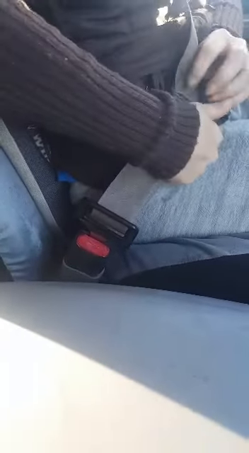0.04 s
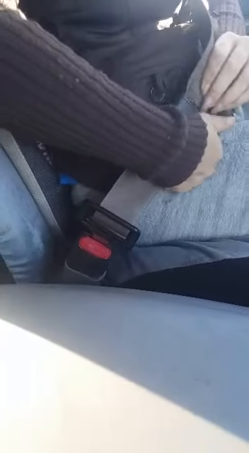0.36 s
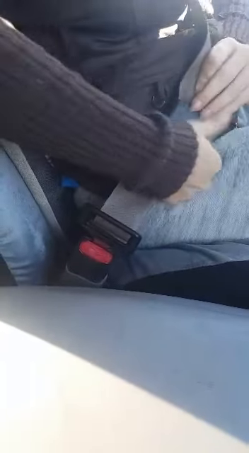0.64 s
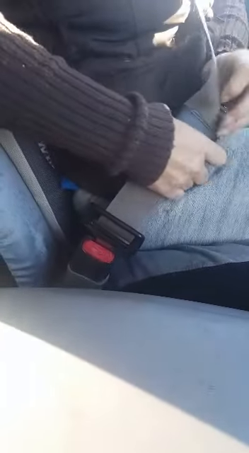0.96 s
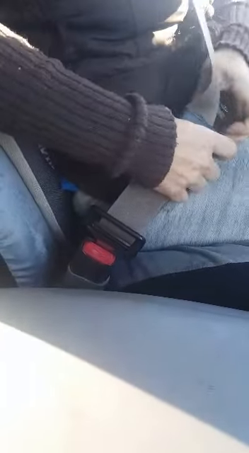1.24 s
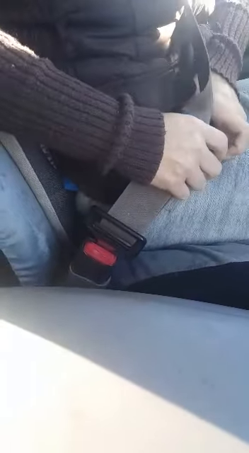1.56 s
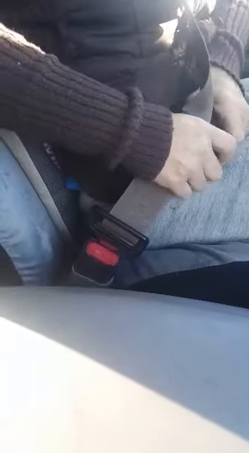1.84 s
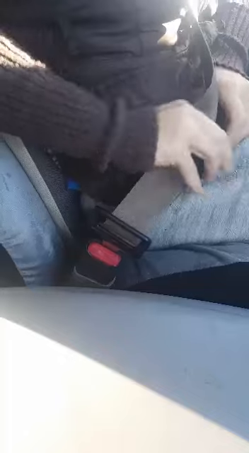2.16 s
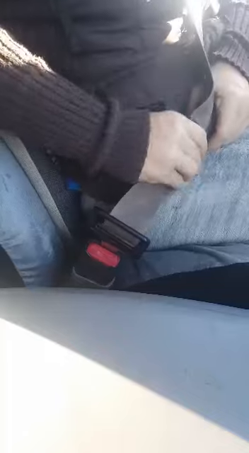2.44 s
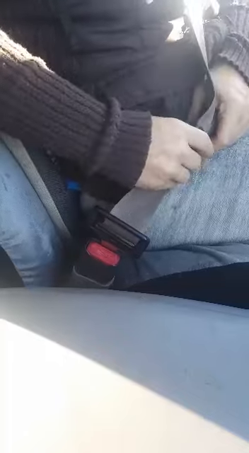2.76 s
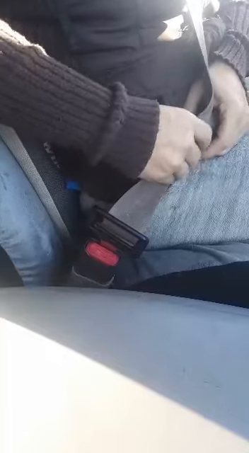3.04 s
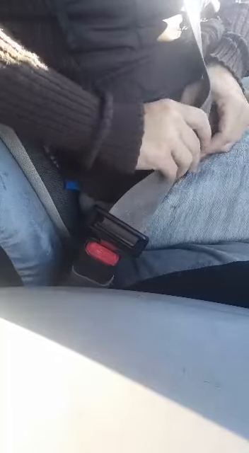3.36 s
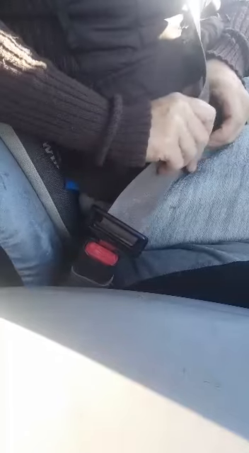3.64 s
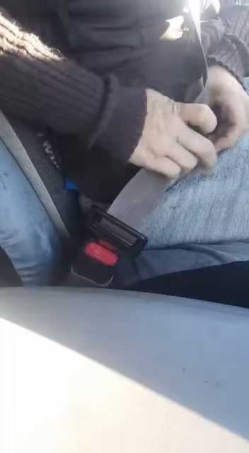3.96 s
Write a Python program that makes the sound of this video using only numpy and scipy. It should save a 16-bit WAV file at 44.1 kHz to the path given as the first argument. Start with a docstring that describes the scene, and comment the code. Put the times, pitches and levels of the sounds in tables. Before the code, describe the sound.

Close handling of a seat belt in a padded car cabin: soft sleeve rustles and brushes first, a small buckle click, then a cluster of sharper webbing scrapes. The engine hums low throughout.

```python
"""Inside a car with its engine idling, hands work along a fastened seat belt.
The engine hums over a low rumble. Tiny slips of fibres make sleeves rustle, hands brush
cloth and the belt's weave rasp in short scrapes. Fingertips pat, nails snap over the weave,
the buckle ticks as its latch knocks, and one tug on the belt thuds in the seat.
The padded cabin gives the brushes, scrapes and clicks a very short echo."""
import sys
import numpy as np
from scipy import signal
from scipy.fft import rfft, irfft
from scipy.io import wavfile

SR = 44100
rng = np.random.default_rng(int(sys.argv[2]) if len(sys.argv) > 2 else 0)


def unload_audio(sound):
    """Save the sound as a 16-bit wav file, at the path given as the first command line argument."""
    columns = np.transpose(np.atleast_2d(sound))
    # keep every value between -1 and 1, then stretch to whole-number steps
    steps = np.round(np.clip(columns, -1, 1) * 32767)
    wavfile.write(sys.argv[1], SR, steps.astype(np.int16))


N = 176400  # 4 seconds

# tones of the idling engine: (multiple of the cycle rate, level [dB])
ENGINE_TONES = [(5, -78), (7, -55), (8, -47.5), (11, -49), (13, -55.5), (16, -47), (19, -44), (21, -51.5),
                (32, -65), (48, -55.5)]
# tone colour of the cabin's rumble and air: (frequency [Hz], relative level [dB])
RUMBLE_COLOUR = [(12, -32), (30, -11), (55, -3), (88, -5.5), (113, 7), (126, 3.5), (141, 1), (152, 4),
                 (168, -8), (190, 0.5), (222, -7.5), (256, 0), (295, -8), (325, -13.5), (420, -19.5),
                 (520, -23.5), (680, -25), (1100, -28.5), (1600, -35), (3000, -41), (5000, -46.5),
                 (16000, -50)]
# how alike the rumble is on both sides: (frequency [Hz], likeness [1 or more = alike])
RUMBLE_LIKENESS = [(50, 1.9), (115, 0.78), (200, 1.04), (300, 0.8), (700, 0.62), (1300, -0.11),
                   (2500, 0.15), (6000, 0)]
# which side the rumble leans to: (frequency [Hz], left minus right [dB])
RUMBLE_BALANCE = [(60, -2), (120, 2.6), (270, -3), (700, 1), (2500, 1.5), (12000, 2.5)]
# sleeves sliding on cloth: (time [s], level [dB])
SLEEVE_LEVELS = [(0, -51), (.07, -90), (.33, -63), (.58, -65.5), (.66, -54.5), (.83, -58), (.93, -59),
                 (.99, -53), (1.12, -56.5), (1.27, -55), (1.36, -60.5), (1.57, -56), (1.72, -63),
                 (1.88, -60.5), (2.05, -70), (2.17, -59), (2.25, -64.5), (2.38, -56.5), (2.54, -70.5),
                 (2.68, -65), (2.84, -69.5), (3.2, -81), (3.42, -60.5), (3.78, -83), (4, -61)]
# tone colours of rubbed cloth and belt weave: (frequency [Hz], relative level [dB])
CLOTH_COLOUR = [(150, 3), (450, -8), (900, 0.5), (1600, -4), (2700, -4.5), (5000, -12.5), (8000, -13),
                (16000, -17)]
WEAVE_COLOUR = [(150, -12), (500, -9), (700, -7.5), (1100, -5), (1400, -6), (1800, -2.5), (2450, 0),
                (2750, -2), (3200, 0), (4200, -7), (5500, -6.5), (7200, -5), (10000, -6), (15500, -10)]
# hands brushing cloth, and fingers scraping the belt:
# (peak time [s], rise [s], fall [s], level [dB], treble tilt [dB per octave])
HAND_BRUSHES = [(.772, 0.025, .025, -45, -4), (.846, 0.11, .03, -48, 1), (.99, 0.052, 0.038, -50, -2.5),
                (1.288, 0.038, 0.038, -45.5, -2), (1.579, 0.064, 0.035, -43, -4),
                (1.647, 0.032, 0.022, -40, -8), (1.79, 0.055, .06, -50, -12),
                (1.886, 0.031, 0.017, -43, -4), (2.18, 0.05, 0.024, -55, 2),
                (2.34, 0.11, 0.066, -59.5, -2.5), (3.914, 0.013, 0.046, -39.5, -6)]
BELT_SCRAPES = [(.125, 0.024, 0.016, -39.5, -5), (.271, 0.053, 0.022, -44, -1),
                (.844, .035, .025, -49.5, -2.5), (3.231, 0.0056, 0.02, -23, 1),
                (3.259, 0.021, 0.032, -25.5, -0.5), (3.466, 0.0036, 0.014, -28.5, 0.1),
                (3.621, 0.029, 0.046, -18.5, -0.5), (3.688, 0.026, 0.0089, -40, -2.5)]
# fingertips patting belt and lap, and nails and the belt's edge snapping over the weave:
# (time [s], relative level [dB], treble tilt [dB per octave])
FINGER_PATS = [(.358, -38, -5.5), (.8235, -34.5, -3), (.896, -41.5, -1), (1.046, -43.5, -2),
               (1.223, -45, -12), (1.647, -41, 1), (1.717, -48.5, -4), (1.737, -39.5, -13),
               (1.775, -38, -12), (1.783, -43, -5), (1.829, -50, -7), (1.953, -48.5, -1), (1.92, -43.5, 1),
               (2.079, -54, -11), (2.565, -48.5, -5), (2.658, -46, -0.5), (3.659, -24, 4), (3.747, -47, -1),
               (3.8, -46, -1.5), (3.8145, -38, -2), (3.835, -38.5, -2), (3.875, -39, -1.5),
               (3.91, -41, 3.5)]
NAIL_SNAPS = [(.112, -49, -3.5), (.256, -42.5, 0), (.333, -48.5, -1.5), (1.386, -46.5, 3),
              (1.478, -41, 1.5), (1.684, -50.5, 4), (2.131, -42, -3.5), (2.401, -50.5, -1), (2.725, -57, 6),
              (2.89, -49, -2.5), (2.899, -47, -5.5), (2.945, -55, -2.5), (2.995, -59.5, 6),
              (3.094, -36.5, -2.5), (3.158, -38, 0), (3.218, -44, 0), (3.248, -30.5, -3), (3.29, -35, 1),
              (3.301, -41, 4), (3.311, -35, 2), (3.367, -39.5, -0.5), (3.373, -41, 0), (3.399, -45, 1),
              (3.432, -46.5, -2), (3.49, -44.5, -1), (3.544, -36, 3), (3.576, -43, 6), (3.584, -38, 1),
              (3.595, -22.5, 0), (3.641, -24, 2)]
# tone colours of a pat and a snap: (frequency [Hz], relative level [dB])
PAT_COLOUR = [(200, -14), (500, -2.5), (700, -0.5), (1150, 3.5), (1600, -9.5), (2700, -3.5), (4500, -13),
              (8000, -20), (16000, -25)]
SNAP_COLOUR = [(200, 6), (900, 0.5), (2500, 5.5), (4500, -3), (7500, 1.5), (16000, -6.5)]
# the belt tugging on the seat: (time [s], level [dB])
BELT_TUGS = [(3.549, -26)]
# the latch tongue knocking and bouncing in the buckle: (time [s], level [dB])
LATCH_KNOCKS = [(1.1563, -23), (1.159, -42), (1.1656, -29.5), (1.171, -37), (3.4642, -28)]
# the buckle's ringing tones: (frequency [Hz], relative level [dB], time to fade 60 dB [s])
BUCKLE_TONES = [(886, -14.5, 0.047), (1130, -7.5, 0.017), (1630, -7, 0.0064), (2050, -4, 0.0095),
                (2380, -2, 0.01), (2550, -6, 0.0099), (2750, -6.5, 0.02), (2990, -14.5, 0.015),
                (4860, -39, 0.01), (8260, -22, 0.0073)]
# the cabin's echo: (frequency [Hz], time to fade 60 dB [s])
CABIN_FADE = [(300, 0.052), (1300, 0.07), (3500, 0.091), (10000, 0.084)]
# tone colour of the microphone: (frequency [Hz], gain [dB])
MIC_COLOUR = [(5500, 0.5), (7200, 2), (8400, 5.5), (9300, -3), (10200, -4.5), (12300, -1), (15500, -1)]
# how far the right microphone opening's wave runs ahead: (frequency [Hz], phase lead [radians])
RIGHT_MIC_PHASE = [(1200, 0), (1900, -0.05), (2450, 1.04), (2950, -0.5), (3600, 0.6), (4600, -1),
                   (6000, 1.5), (8000, 0.5)]
# the right opening's level against the left: (frequency [Hz], gain [dB])
RIGHT_MIC_GAIN = [(1200, -0.13), (2400, 0.51), (4000, 0.76), (8000, -2), (13000, -1.3)]

RIGHT_LAG_S = .00016  # handling sounds reach the right side this much later


def amp(db):
    """Turns decibels into a number to multiply by."""
    return 10 ** (np.asarray(db) / 20)


def unit(x):
    """Scales a signal to an average strength (rms) of 1."""
    return x / np.sqrt(np.mean(x ** 2) + 1e-20)


def read(points, hz):
    """Looks up a table between its rows, with octaves evenly spaced."""
    f, value = np.transpose(points)
    return np.interp(np.log(hz + 1), np.log(f + 1), value)


def add(mix, s, sound):
    """Mixes a sound in, starting at s seconds."""
    part = mix[..., max(0, round(s * SR)):][..., :sound.shape[-1]]
    part += sound[..., :part.shape[-1]]


def colour(points, tilt=0, size=1024):
    """Makes a filter from a tone colour, tilted above 700 Hz by tilt dB per octave."""
    hz = np.fft.rfftfreq(size, 1 / SR)
    log_gain = np.log(amp(read(points, hz) + tilt * np.log2(np.maximum(hz, 700))))
    mirrored = np.r_[log_gain, log_gain[-2:0:-1]]
    response = np.fft.ifft(np.exp(np.conj(signal.hilbert(mirrored)))).real  # never rings ahead of a hit
    return response / np.linalg.norm(response)


def wander(hz):
    """A smooth random wobble, up to about hz times a second."""
    smoothing = np.exp(-(np.fft.rfftfreq(N, 1 / SR) / hz) ** 2)
    return unit(irfft(rfft(rng.standard_normal(N)) * smoothing, N))


def slips(per_s, spread_db):
    """Fibres slip at random moments, making tiny clicks and a few large ones."""
    clicks = rng.standard_normal(N) * (rng.random(N) < per_s / SR)
    return unit(clicks * amp(spread_db * np.minimum(rng.exponential(1, N), 3)))


def friction(per_s, spread_db, shared):
    """Slips over a patch of fabric: some reach both sides, the rest only one."""
    both, left, right = (slips(per_s, spread_db) for _ in range(3))
    return np.sqrt(shared) * both + np.sqrt(1 - shared) * np.array([left, right])


def cabin(x, right_db, tail_db=-4.5, bounce_db=-1, bounce_s=.003, bounces=24, size=4096):
    """Sound arrives directly, then bounces off close surfaces and dies quickly in the padding."""
    hz, t, noise = signal.stft(rng.standard_normal((2, size)), SR, nperseg=128)
    fade = amp(-60 * t / read(CABIN_FADE, hz)[:, None])
    tail = signal.istft(noise * fade, SR, nperseg=128)[1]
    paths = amp(tail_db) * tail / np.linalg.norm(tail, axis=1, keepdims=True)
    for path, lag in zip(paths, (0, RIGHT_LAG_S)):
        add(path, lag, np.ones(1))  # direct sound
        for when, sign in zip(rng.random(bounces), rng.choice([-1, 1], bounces)):
            add(path, lag + when * bounce_s, np.array([sign * amp(bounce_db) / np.sqrt(bounces)]))
    paths /= np.linalg.norm(paths, axis=1, keepdims=True)
    return signal.fftconvolve(x * np.ones((2, 1)), paths, axes=1) * amp([[0], [right_db]])


def engine(cycle_hz=6.19, drift=0.003033, drift_hz=0.94, waver_db=1.5, waver_hz=2.3):
    """The engine's repeating cycle hums: its speed drifts a little and each tone wavers in level."""
    cycles = np.cumsum(cycle_hz * (1 + drift * wander(drift_hz))) / SR
    hum = np.zeros(N)
    for multiple, db in ENGINE_TONES:
        strength = np.sqrt(2) * amp(db + waver_db * wander(waver_hz))
        hum += strength * np.sin(2 * np.pi * (multiple * cycles + rng.random()))
    return hum


def rumble(level_db=-40.5):
    """Steady cabin noise, nearly alike on both sides in the bass, with a faint hiss above."""
    hz = np.fft.rfftfreq(N, 1 / SR)
    left, other = rfft(rng.standard_normal((2, N)))
    likeness = np.clip(read(RUMBLE_LIKENESS, hz), -1, 1)
    right = likeness * left + np.sqrt(1 - likeness ** 2) * other
    lean = amp(read(RUMBLE_BALANCE, hz) / 2)
    spectrum = np.array([left * lean, right / lean]) * amp(read(RUMBLE_COLOUR, hz))
    return amp(level_db) * unit(irfft(spectrum, N))


def sleeves(flutter_db=-0.5, flutter_hz=35, right_db=-3.0):
    """Sleeves slide on cloth with a fine rustle that swells as the arms move."""
    level = np.interp(np.arange(N) / SR, *np.transpose(SLEEVE_LEVELS)) + flutter_db * wander(flutter_hz)
    left, right = friction(per_s=5000, spread_db=4, shared=0.36)
    grains = np.array([left, amp(right_db) * np.roll(right, round(RIGHT_LAG_S * SR))])
    return amp(level) * signal.oaconvolve(grains, colour(CLOTH_COLOUR)[None], axes=1)[:, :N]


def seat_thud(pitch_hz=67.4, fade_s=0.026, size=12000):
    """A pull on the belt rocks the seat for a few slow swings."""
    out, t = np.zeros(N), np.arange(size) / SR
    for s, db in BELT_TUGS:
        add(out, s, amp(db) * np.exp(-t / fade_s) * np.sin(2 * np.pi * pitch_hz * t))
    return out


def buckle(crack_db=-4, crack_s=0.0012, right_db=-3.5, size=4000):
    """Each knock of the latch makes a noisy crack and sets the buckle ringing briefly."""
    out, t = np.zeros((2, N)), np.arange(size) / SR
    ring = sum(amp(db - 60 * t / fade_s) * np.sin(2 * np.pi * hz * t) for hz, db, fade_s in BUCKLE_TONES)
    for s, db in LATCH_KNOCKS:
        crack = amp(crack_db) * rng.standard_normal(size) * np.exp(-t / crack_s)
        add(out, s, cabin(amp(db) * (ring + crack), right_db))
    return out


def taps(rows, tone, gain_db, grit, grit_s, right_db, size=900):
    """A fingertip or nail meets fabric: one click, then a few milliseconds of gritty noise."""
    out, t = np.zeros((2, N)), np.arange(size) / SR
    for s, db, tilt in rows:
        click = (t == 0) + grit * rng.standard_normal(size) * np.exp(-t / grit_s)
        sound = signal.fftconvolve(click / np.linalg.norm(click), colour(tone, tilt))
        add(out, s, cabin(amp(db + gain_db) * sound, right_db))
    return out


def strokes(rows, tone, grains, catch_db, catch_hz, right_db, swell_db=20):
    """A hand drags over fabric, catching unevenly: each run of slips swells and fades."""
    out = np.zeros((2, N))
    grains = unit(grains * amp(catch_db * wander(catch_hz)))
    for peak, rise, fall, db, tilt in rows:
        span = np.arange(max(0, int((peak - 2 * rise) * SR)), min(N, int((peak + 2 * fall) * SR)))
        t = span / SR - peak
        force = amp(db - swell_db * np.maximum(-t / rise, t / fall))
        rasp = signal.fftconvolve(grains[:, span] * force, colour(tone, tilt)[None], axes=1)
        add(out, span[0] / SR, cabin(rasp, right_db))
    return out


def scene():
    """Lays the sounds of hands and belt over the idling car."""
    car = engine() + rumble()
    rustle = sleeves()
    cloth_slips = friction(per_s=4000, spread_db=1.5, shared=0.52)
    brushes = strokes(HAND_BRUSHES, CLOTH_COLOUR, cloth_slips, catch_db=2.0, catch_hz=149, right_db=0)
    weave_slips = friction(per_s=6000, spread_db=5, shared=0.88)
    scrapes = strokes(BELT_SCRAPES, WEAVE_COLOUR, weave_slips, catch_db=1.5, catch_hz=403, right_db=-2)
    pats = taps(FINGER_PATS, PAT_COLOUR, gain_db=18.5, grit=0.3, grit_s=0.0023, right_db=-1)
    snaps = taps(NAIL_SNAPS, SNAP_COLOUR, gain_db=21, grit=0.5, grit_s=0.0026, right_db=-1.5)
    return car + rustle + brushes + seat_thud() + buckle() + pats + snaps + scrapes


def record(dry, cutoff_hz=15900, size=2048):
    """The microphone's two openings each colour the sound, and the highest treble is cut off."""
    padded = np.pad(dry, ((0, 0), (size, size)), "reflect", reflect_type="odd")
    count = padded.shape[1]
    hz = np.fft.rfftfreq(count, 1 / SR)
    left, right = rfft(padded) * amp(read(MIC_COLOUR, hz))
    right = right * amp(read(RIGHT_MIC_GAIN, hz)) * np.exp(1j * read(RIGHT_MIC_PHASE, hz))
    heard = irfft(np.array([left, right]), count)
    treble_cut = signal.firwin(511, cutoff_hz, window=("kaiser", 9), fs=SR)
    return signal.oaconvolve(heard, treble_cut[None], "same")[:, size:-size]


dry = scene()
out = record(dry)
unload_audio(out)
```